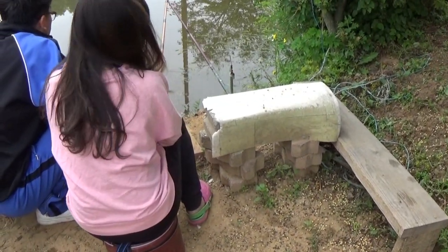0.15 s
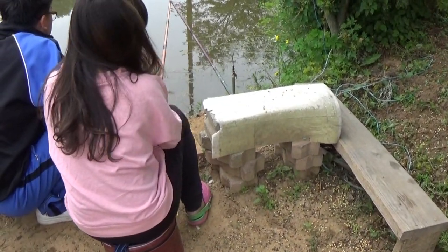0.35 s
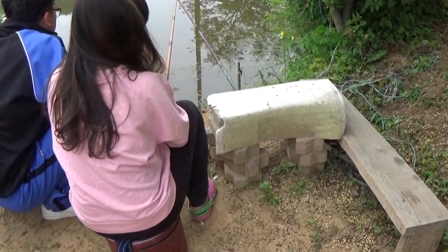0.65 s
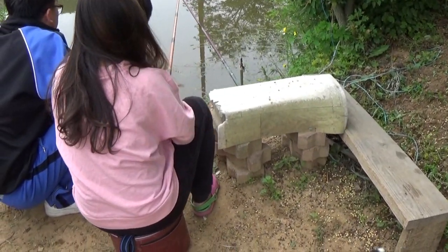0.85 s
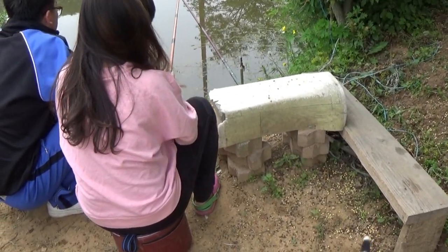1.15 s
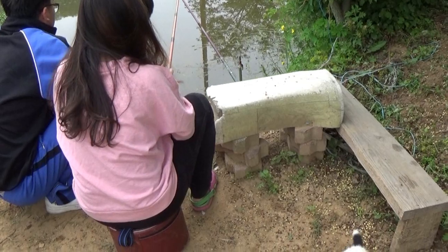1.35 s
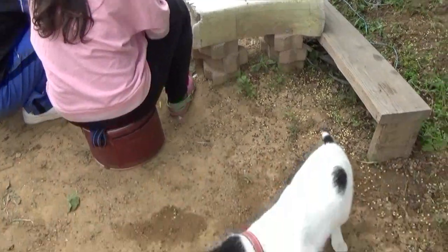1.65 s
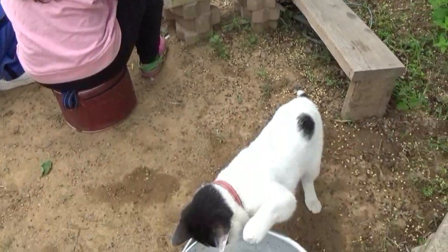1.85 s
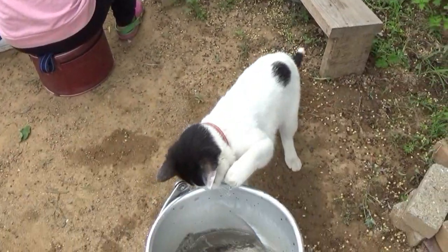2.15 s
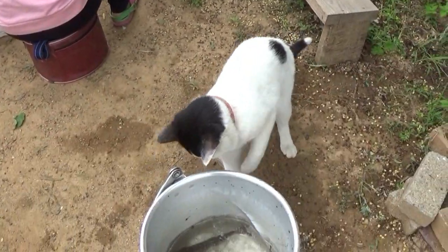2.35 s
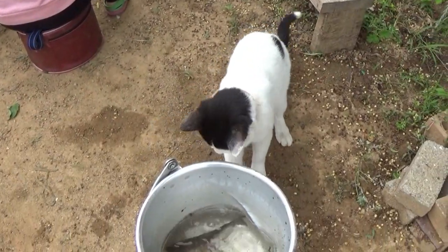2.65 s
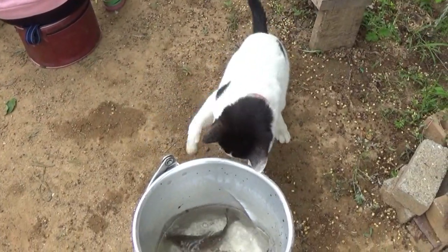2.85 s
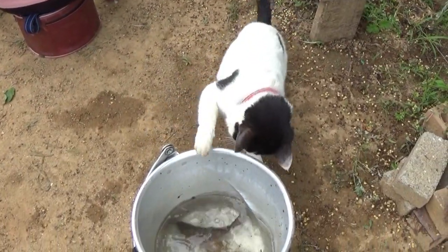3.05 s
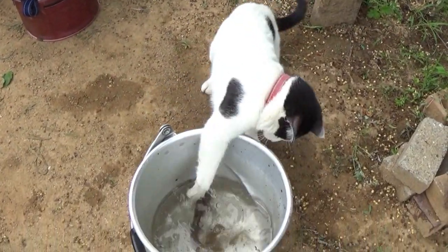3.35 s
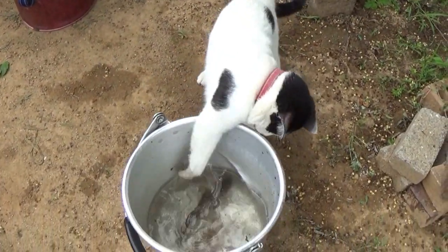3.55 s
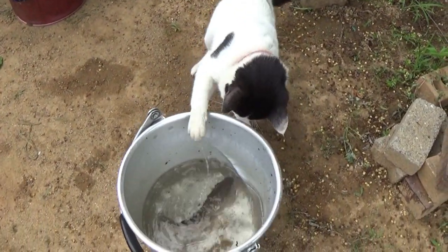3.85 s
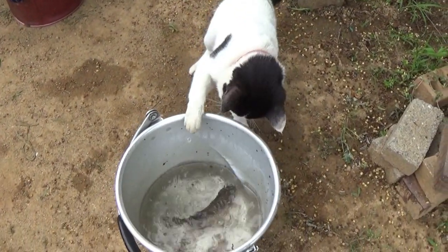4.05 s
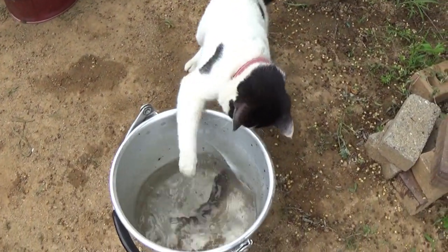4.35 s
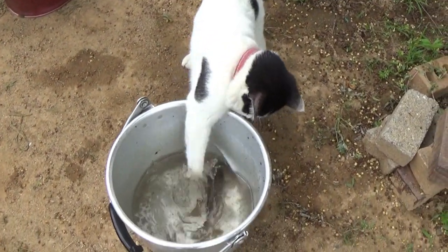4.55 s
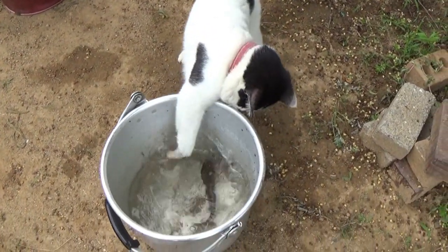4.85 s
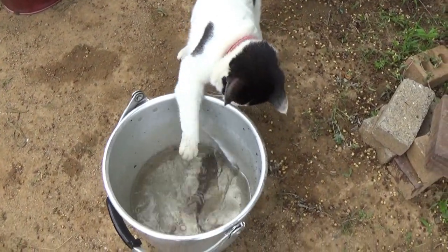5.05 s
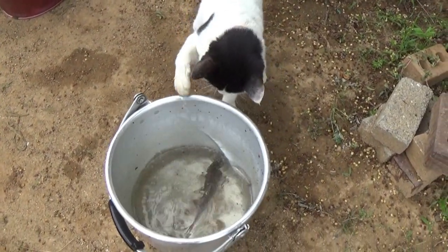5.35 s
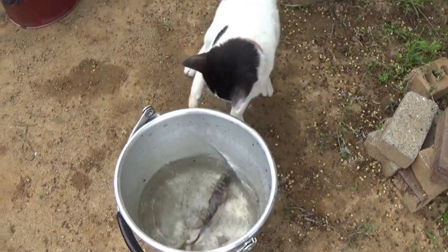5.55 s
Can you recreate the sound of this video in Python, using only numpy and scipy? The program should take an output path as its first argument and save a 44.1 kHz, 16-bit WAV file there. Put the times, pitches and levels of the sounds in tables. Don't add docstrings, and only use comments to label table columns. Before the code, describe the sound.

A quiet outdoor place by a pond: soft airy hush, a faint drone of far machinery, and very soft, rapid, even motor ticks beside the microphone throughout. From the start, isolated crisp wet slaps and drips come from a fish in a metal bucket, with a small cluster at 0.8-0.9 s. Short bird whistles rise and fall in the first second. From 1.2 to 1.9 s the fish thrashes harder: sharp smacks, hissing spray, gurgling bubbles and short metallic reflections, while a small damped collar bell ticks rapidly from about 1.5 to 2 s. Then near calm, with sparse drips and faint bell ticks. Two lower bird calls drop at 3.2 and 3.4 s, just before a dense splash burst from 3.4 to 3.8 s. Another lull holds light drips, with a faint peep at 4.2 s. The last strong thrash, with a hard crack, runs 4.7-5.2 s, thinning to small splats and drips by 5.7 s.

```python
import sys
import numpy as np
from scipy import signal
from scipy.fft import rfft, irfft, next_fast_len
from scipy.io import wavfile

SR = 44100
rng = np.random.default_rng(int(sys.argv[2]) if len(sys.argv) > 2 else 0)


def master_out(mix):
    frames = np.transpose(np.atleast_2d(mix))
    ceiling = np.clip(frames, -1, 1)
    pcm = np.round(ceiling * 32767).astype(np.int16)
    wavfile.write(sys.argv[1], SR, pcm)


def nominal_scale(level):
    x = np.asarray(level, float) / 20
    return 10 ** x


N = 251811
T = np.arange(N) / SR

# frequency in Hz, level in dB per Hz.
AIR_SPECTRUM = [(15, -54), (25, -12), (87, -9), (167, -9.5), (197, -4.5), (349, -7), (470, -2), (651, -2),
                (2270, -12), (2820, -12), (6730, -21), (9330, -16.5), (16500, -22.5)]
# frequency in Hz, likeness from 0 to 1.
AIR_LIKENESS = [(60, 1), (180, 0.97), (550, 0.82), (1650, 0.3), (4970, 0.2), (15000, 1)]
AIR_DB = -61.5
# middle in Hz, width in Hz, level in dB.
DRONE_BANDS = [(465.8, 29.6, -70), (1404, 140, -74.5)]

# time in seconds, level of the spray in dB.
STIR = [(0, -62.5), (.45, -66), (.64, -55), (1.15, -58.5), (1.4, -51), (1.62, -51), (2.0, -63.5),
        (3.17, -68), (3.44, -52.5), (3.53, -48), (3.76, -47), (3.92, -57.5), (4.45, -64), (4.62, -56),
        (4.8, -57), (5.0, -44.5), (5.19, -56), (5.3, -59.5)]
STIR_MID_DB = -55
SLOSH_DB, SLOSH_FOLLOWS, SLOSH_LAG_S = -67.5, 0.75, 0.03
GURGLE_DB, GURGLE_FOLLOWS, GURGLE_LAG_S = -61.5, 1.05, 0.017
# frequency in Hz, level in dB per Hz.
SPRAY_SPECTRUM = [(1180, -12), (2000, -3.5), (4710, 5), (5380, 3.5), (6250, 5.5), (10500, 4), (15000, -1),
                  (16500, -55)]
TOP_CUT_HZ = 15850

# first pitch in Hz, last pitch in Hz, level in dB.
MOTOR_TICKS = [(2954, 2780, 1.5), (3425, 3600, -2.5), (2560, 2980, 1)]
MOTOR_DB, MOTOR_FIRST_S, MOTOR_PERIOD_S = -57, .0198, 1.001 / 30

# start in seconds, length in seconds, first pitch in Hz, last pitch in Hz, level in dB.
WHISTLES = [
    (0.064, 0.06, 1950, 2400, -52.5),
    (0.361, 0.12, 2980, 2100, -49),
    (0.631, 0.042, 1820, 2400, -52),
    (0.952, 0.111, 3030, 2050, -49),
    (4.2, 0.027, 2120, 2110, -56),
]
# start in seconds, length in seconds, first pitch in Hz, held pitch in Hz, level in dB.
DROP_CALLS = [
    (3.211, .13, 1553, 1340, -47),
    (3.392, 0.093, 1815, 1525, -48),
]
WHISTLE_SWELL, CALL_DROP_S, CALL_FADE_DB_PER_S = 0.3, .012, 82

# start in seconds, peak in dB, brightest pitch in Hz,
# time to fade by 60 dB in seconds.
SPLATS = [(.0666, -39.5, 7160, .059), (.1146, -21, 7150, 0.012), (.3023, -32.5, 5500, 0.012),
          (.4249, -32.5, 7850, 0.052), (.5319, -25, 7200, .014), (.5552, -22, 8260, .011),
          (.7674, -21, 8600, 0.015), (.7897, -27, 5000, 0.017), (.8265, -26, 8300, 0.0085),
          (.8525, -33, 6270, .025), (.8815, -34, 7066, 0.075), (.8873, -23, 6850, 0.006),
          (.9035, -25.5, 5360, .006), (1.206, -34, 8040, 0.07), (1.2524, -33, 7500, .012),
          (1.2915, -19, 5230, 0.04), (1.2967, -15, 7100, 0.0092), (1.339, -29, 6700, 0.058),
          (1.4077, -21, 6200, 0.013), (1.4298, -21.5, 6800, 0.022), (1.4335, -17, 6540, .045),
          (1.4568, -38, 5790, 0.014), (1.5231, -18, 5560, 0.01), (1.5601, -22, 5740, 0.024),
          (1.6301, -30.5, 6400, .04), (1.6552, -34, 8150, 0.016), (1.679, -16.5, 8650, 0.019),
          (1.7838, -36, 7800, 0.082), (1.789, -20.5, 7550, 0.011), (1.8637, -30.5, 6950, 0.027),
          (2.4703, -42.5, 8100, 0.024), (3.4321, -33, 6500, 0.11), (3.4645, -23, 5760, 0.05),
                (3.4876, -13, 6370, 0.073), (3.5766, -19, 6270, 0.064), (3.5892, -26, 6400, 0.064),
                (3.6483, -19, 6000, 0.065), (3.679, -25.5, 6060, 0.047), (3.704, -28, 6200, 0.042),
                (3.7422, -20.5, 5500, 0.028), (3.7826, -32, 6450, .025), (3.803, -35, 6350, .025),
                (4.0583, -22.5, 6150, .014), (4.7156, -33, 6200, 0.019), (4.7675, -19, 7830, 0.036),
                (4.7827, -25, 6500, 0.051), (4.8135, -20, 6600, .0098), (4.8219, -24, 11100, .04),
                (4.8593, -20, 6200, 0.054), (4.9205, -23, 9300, 0.03), (4.9373, -17, 7000, 0.049),
                (4.9521, -17.5, 6100, 0.041), (4.959, -21.5, 6630, 0.027), (5.1254, -26, 6150, 0.021),
                (5.133, -24, 6200, 0.04), (5.1486, -18, 5950, 0.0043), (5.3036, -25, 7900, .0091),
                (5.3544, -22.5, 6800, 0.013), (5.395, -38.5, 6060, 0.045), (5.6848, -33.5, 6900, 0.036)]
# start in seconds, peak in dB, pitch in Hz, time to fade by 60 dB in seconds.
PLOPS = [(.1302, -34.5, 2080, 0.034), (.2246, -39, 2970, 0.021), (.5552, -28, 3500, 0.016),
         (.7661, -32, 3120, 0.0087), (.8838, -25, 1080, 0.019), (.8942, -23.5, 1130, 0.049),
         (.9034, -24.5, 1980, 0.016), (1.1348, -27.5, 3150, 0.052), (1.1486, -28.5, 1650, 0.019),
         (1.2951, -34, 4040, 0.076), (1.3459, -29, 2250, 0.022), (1.4178, -32.5, 1440, 0.023),
         (1.4302, -17.5, 3070, 0.015), (1.5233, -24.5, 3600, 0.024), (1.5601, -21, 3930, 0.048),
         (1.6811, -28, 2600, 0.03), (3.5921, -25.5, 3600, 0.03), (3.7115, -26.5, 2900, 0.032),
         (3.7424, -23, 3930, 0.031), (3.796, -31.5, 2400, 0.055), (4.5788, -33, 2600, 0.017),
         (4.8137, -23, 3300, .013), (4.8244, -16.5, 4090, 0.022), (4.9274, -23, 1046, 0.029),
         (4.9387, -22.5, 2770, 0.055), (4.9476, -23, 1630, 0.11), (4.9766, -23.5, 3830, 0.071),
         (5.1167, -26.5, 1780, 0.054), (5.1377, -16.5, 3200, 0.01), (5.2606, -33, 1870, 0.067)]
# start in seconds, peak in dB, brightest pitch in Hz.
DRIPS = [(0.6254, -24, 9000), (0.659, -18, 11600), (0.7835, -26.5, 7260), (0.9426, -32, 12000),
         (.9588, -31, 7660), (1.1352, -14, 11200), (1.2748, -30, 10500), (1.3179, -24.5, 10700),
         (1.3687, -25, 10900), (1.423, -21, 11000), (1.4813, -33, 12500), (1.5878, -28, 11500),
         (1.7945, -16.5, 11370), (2.2049, -38.5, 10700), (2.6337, -42, 9200), (2.6709, -34, 9500),
         (3.085, -28, 9700), (4.33, -31.5, 11700), (4.3757, -26.5, 10400), (4.3894, -35, 10700),
         (4.4595, -37, 10600), (4.579, -29, 10300), (4.6452, -27, 9850), (4.6736, -28.5, 9400),
         (4.6785, -27.5, 9200), (4.829, -20, 7400), (5.0063, -22.5, 11500), (5.0403, -25.5, 10400),
         (5.0845, -21, 10300), (5.3423, -30, 9800)]
DRIP_T60_S = 0.016
# start in seconds, peak in dB, brightest pitch in Hz, time to fade by 60 dB in seconds.
CRACKS = [(.131, -38, 7500, .04), (.2885, -44, 11000, .012), (.4262, -39, 11000, .03),
          (.547, -30, 7600, .008), (.585, -46, 10800, .01), (1.0495, -43, 8310, .01),
          (1.2145, -31, 12000, .01), (1.2518, -33, 11800, .01), (1.339, -31, 10500, .012),
          (1.458, -29, 13000, .01), (1.498, -33, 7900, .012), (1.5145, -37, 9330, .01),
          (1.549, -34, 10500, .01), (1.6305, -35, 10500, .015), (1.654, -31, 13000, .012),
          (1.783, -32, 8200, .01), (1.812, -38, 7500, .02), (1.861, -34, 13000, .02),
          (1.915, -43, 10300, .015), (1.96, -46, 10600, .01), (1.977, -44, 11500, .01),
          (1.988, -43, 10000, .01), (2.009, -43, 9670, .01), (3.331, -41, 10800, .04),
          (3.4875, -19, 9300, .03), (3.5775, -19, 10200, .03), (3.642, -28, 11000, .02),
          (3.6485, -22, 9000, .03), (3.782, -34, 10500, .015), (3.803, -33, 11800, .02),
          (4.057, -28, 11400, .012), (4.606, -41, 10800, .01), (4.634, -40, 11000, .01),
          (4.797, -34, 14000, .008), (4.8275, -7, 8500, .004), (4.83, -19, 10500, .02),
          (4.883, -29, 10500, .02), (4.905, -37, 9600, .012), (4.9375, -19, 10400, .025),
          (5.031, -30, 9500, .01), (5.067, -29, 11800, .015), (5.0845, -23, 11000, .01),
          (5.125, -30, 13500, .025), (5.44, -42, 8940, .015), (5.577, -43, 10500, .015)]
# start in seconds, peak in dB, brightest pitch in Hz, time to fade by 60 dB in seconds.
SNAPS = [(.1138, -15, 10500, .01), (.5305, -21, 9500, .01), (.6265, -13, 8800, .008),
         (.6595, -21, 13500, .008), (.767, -23, 11000, .01), (.9425, -34, 13500, .01),
         (1.135, -24, 13000, .01), (1.4235, -26, 12500, .008), (1.5228, -28, 11000, .01),
         (1.681, -14, 8800, .008), (3.4647, -17, 10800, .025), (3.7422, -24, 9500, .018),
         (4.768, -22, 11500, .02), (4.9265, -32, 13000, .01)]
# middle in seconds, half length in seconds, level in dB, low Hz, high Hz.
SURGES = [(0.709, 0.014, -49, 320, 4500), (.886, 0.026, -44, 170, 500), (1.6, .09, -53, 280, 420),
          (3.51, .04, -50, 300, 520), (3.72, .08, -52, 290, 480), (3.6, .04, -51, 800, 1300),
          (3.72, .06, -51, 850, 1400), (1.4, .08, -52, 650, 1500), (1.7, .035, -46, 1000, 5500),
          (1.34, .04, -48, 2500, 5000), (1.24, .035, -51, 3500, 6000), (4.83, .012, -44, 900, 3000),
          (4.965, .025, -39, 3600, 5200), (3.5, .02, -40, 3400, 5200), (.116, .005, -36, 4000, 8000),
          (.889, .03, -39, 550, 2200), (0.883, 0.043, -46.5, 1700, 7860), (5.424, 0.077, -55, 1260, 5000),
          (3.31, 0.051, -56, 5500, 13500), (3.104, 0.04, -55, 6700, 11300),
          (1.446, 0.014, -35.5, 5200, 6600), (3.366, 0.026, -44, 2400, 15000),
          (3.505, 0.028, -38, 1070, 4000), (3.588, 0.026, -42, 1800, 12600),
          (3.655, 0.015, -34, 2650, 11000), (4.865, 0.037, -38, 1490, 10600),
          (4.937, 0.0091, -38, 390, 1030), (4.96, 0.056, -35.5, 1040, 5100),
          (5.079, 0.013, -39.5, 2500, 12000), (5.147, 0.03, -38.5, 3200, 5700),
          (5.15, 0.05, -40.5, 1360, 3400)]
# start in seconds, peak in dB, first pitch in Hz, last pitch in Hz, length in seconds.
BUBBLES = [(0.608, -34, 2400, 2050, 0.013), (.958, -27.5, 1387, 1780, 0.033),
           (1.443, -36, 2300, 1960, 0.04), (1.458, -42.5, 1035, 1660, 0.04),
           (1.495, -25, 1156, 2070, 0.026), (1.53, -38, 1600, 1730, 0.016), (1.547, -39, 475, 703, 0.039),
           (1.589, -31.5, 1240, 2110, 0.035), (1.593, -41, 936, 1230, 0.054),
           (1.681, -33, 1060, 1250, 0.03), (1.694, -40, 2350, 2500, .012), (3.489, -34, 1300, 1200, .035),
           (3.489, -36, 2150, 2300, .03), (3.487, -30, 7200, 7300, .015), (3.702, -42, 1050, 1170, .025),
           (.208, -56, 6650, 6650, .015), (4.975, -36, 1050, 1250, .035), (5.162, -38, 1500, 2000, .025),
           (5.179, -42, 2300, 2200, .02), (1.33, -46, 4300, 4300, .02), (1.245, -46, 4600, 4800, .012),
           (1.258, -51, 3300, 3150, 0.023), (1.297, -43.5, 1790, 1870, 0.017),
           (3.362, -59, 2800, 2810, 0.019), (3.758, -41, 1170, 1310, 0.026),
           (3.795, -39.5, 1055, 1350, 0.051), (3.796, -48, 2260, 2600, 0.023),
           (4.308, -41, 1580, 1430, 0.014), (4.331, -47.5, 1410, 1840, 0.025),
           (4.795, -49, 643, 1023, 0.068), (4.949, -24, 4310, 4690, 0.026),
           (1.363, -33.5, 1274, 1520, 0.0064), (5.152, -40, 1240, 1860, 0.03),
           (3.488, -23, 4760, 4860, 0.03), (3.486, -25, 6230, 6250, 0.017)]
# start in seconds, peak in dB, pitch in Hz.
BELL_TICKS = [(.4803, -46, 4240), (1.4606, -40, 4180), (1.4815, -29.5, 4190), (1.5429, -32, 4190),
              (1.6187, -21.5, 4210), (1.6484, -41, 4260), (1.6934, -36, 4330), (1.712, -27, 4180),
              (1.729, -29, 4170), (1.7344, -32, 3950), (1.7444, -36, 4050), (1.7739, -33, 4180),
              (1.7868, -35, 3980), (1.8178, -32, 4200), (1.8751, -33, 4230), (1.9001, -37, 4260),
              (1.925, -35, 4260), (1.948, -38, 4310), (1.9679, -40, 4290), (2.1016, -46, 4280),
              (2.2862, -49, 4150), (2.3044, -50, 4160), (2.4894, -48, 4000), (2.8025, -46, 4280),
              (3.475, -31, 4190), (5.3009, -42, 4140), (5.3617, -47, 4160)]
# pitch in Hz, level against the tick in dB.
BELL_OVERTONES = [(9500, -30), (13100, -27)]
BELL_T60_S = .027

# delay in seconds, level in dB.
WALL_ECHOES = [(.0019, -22), (.0032, -24), (.0053, -18), (.0087, -19)]
# time in seconds, left minus right in dB.
BUCKET_PAN = [(0, -0.5), (1.9, -2.5), (2.3, 0.5), (5.71, 1)]


def rms_one(x):
    return x / np.sqrt(np.mean(x ** 2) + 1e-20)


def in_time(rows):
    s, *columns = np.transpose(rows)
    return [np.interp(T, s, column) for column in columns]


def at_hz(points, hz):
    points_hz, points_db = np.transpose(points)
    return np.interp(np.log(np.maximum(hz, 1)), np.log(points_hz), points_db)


def coloured(x, spectrum):
    size = next_fast_len(N)
    hz = np.arange(size // 2 + 1) * SR / size
    gain = nominal_scale(at_hz(spectrum, hz)) * (hz < TOP_CUT_HZ)
    return rms_one(irfft(rfft(x, size) * gain, size)[:N])


def band(x, low_hz, high_hz):
    edges = [low_hz, min(high_hz, SR * .45)]
    return signal.sosfilt(signal.butter(2, edges, "band", fs=SR, output="sos"), x)


def drift(rate):
    knots = np.arange(0, N / SR + 1, .5 / rate)
    return np.interp(T, knots, rng.standard_normal(len(knots)))


def sweep(hz):
    return np.sin(2 * np.pi * np.cumsum(hz) / SR)


def ring(clicks, hz, t60):
    r, w = nominal_scale(-60 / (t60 * SR)), 2 * np.pi * hz / SR
    return signal.lfilter([0, np.sin(w)], [1, -2 * r * np.cos(w), r * r], clicks + 1e-18)


def add(out, s, piece):
    at = round(s * SR)
    out[at:at + len(piece)] += piece[:N - at]


def grains(per_s, spread_db, low_hz, high_hz, cycles):
    sizes = nominal_scale(spread_db * np.minimum(rng.exponential(1, N), 4)) * rng.choice([-1, 1], N)
    clicks = sizes * (rng.random(N) < per_s / SR)
    dealt = rng.integers(0, 16, N)
    pitches = np.geomspace(low_hz, high_hz, num=16)
    rings = sum(ring(clicks * (dealt == k), hz, cycles / hz) for k, hz in enumerate(pitches))
    return rms_one(band(rings, low_hz * 0.88, 17000))


def air():
    hz, likeness = np.transpose(AIR_LIKENESS)
    likeness = np.clip(likeness, 0, .99)
    apart_db = 10 * np.log10((1 - likeness) / (1 + likeness))
    side_spectrum = [(f, db + np.interp(f, hz, apart_db)) for f, db in AIR_SPECTRUM]
    mid = coloured(rng.standard_normal(N), AIR_SPECTRUM)
    side = coloured(rng.standard_normal(N), side_spectrum)
    return nominal_scale(AIR_DB + 0.69 * drift(2.4)) * (mid + nominal_scale(-4.0) * side * [[1], [-1]])


def drone():
    out = np.zeros(N)
    for hz, width, db in DRONE_BANDS:
        out += nominal_scale(db) * rms_one(band(rng.standard_normal(N), hz - width / 2, hz + width / 2))
    return out


def churn():
    spray_db, = in_time(STIR)
    swing = spray_db - STIR_MID_DB
    slosh_db = SLOSH_DB + SLOSH_FOLLOWS * np.interp(T - SLOSH_LAG_S, T, swing)
    gurgle_db = GURGLE_DB + GURGLE_FOLLOWS * np.interp(T - GURGLE_LAG_S, T, swing)
    slosh = rms_one(band(band(rng.standard_normal(N), 280, 560), 280, 560))
    gurgle = band(grains(500, 2.8, 850, 2600, 24.0), 800, 9000)
    mist = grains(5000, 2.4, 2140, 16300, 9.5) + 0.45 * rng.standard_normal(N)
    spray = nominal_scale(3.6 * drift(60) - .6) * coloured(mist, SPRAY_SPECTRUM)
    droplets = nominal_scale(-5) * grains(220, 3.0, 1600, 9000, 30.0)
    specks = nominal_scale(-22) * grains(70, 3.0, 8500, 15000, 9.0)
    fizz = nominal_scale(-77) * grains(36, 2.0, 8000, 12000, 14.0)
    low = nominal_scale(slosh_db + 1.0 * drift(25)) * slosh + nominal_scale(gurgle_db + 2.2 * drift(30)) * gurgle
    return low + nominal_scale(spray_db) * (spray + droplets + specks) + fizz


def motor():
    out, u = np.zeros(N), np.linspace(0, 1, num=360)
    steady, overtone, gliding = [nominal_scale(db) * np.hanning(len(u)) * sweep(first_hz + (last_hz - first_hz) * u)
                                 for first_hz, last_hz, db in MOTOR_TICKS]
    times = np.arange(MOTOR_FIRST_S, N / SR, MOTOR_PERIOD_S)
    chances_db = rng.normal(0, 1.0, (len(times), 2))
    for k, (s, (whole_db, top_db)) in enumerate(zip(times, chances_db)):
        tick = gliding if k % 2 else steady + nominal_scale(top_db) * overtone
        add(out, s, nominal_scale(MOTOR_DB + whole_db) * tick)
    return out


def birds():
    out, flutter = np.zeros(N), nominal_scale(1.7 * drift(60))
    for s, length, first_hz, last_hz, db in WHISTLES:
        u = np.arange(round(length * SR)) / (length * SR)
        hz = first_hz + (last_hz - first_hz) * (u + np.sin(np.pi * u / 2) ** 2) / 2
        add(out, s, nominal_scale(db - 4.5) * np.sin(np.pi * u) ** WHISTLE_SWELL * sweep(hz))
    for s, length, first_hz, held_hz, db in DROP_CALLS:
        t = T[:round(length * SR)]
        hz = held_hz + (first_hz - held_hz) * np.exp(-t / CALL_DROP_S)
        ends = np.clip(np.minimum(t, length - t) / 0.005, 0, 1)
        add(out, s, ends * nominal_scale(db - 3.5 - CALL_FADE_DB_PER_S * t) * sweep(hz))
    return out * flutter


def slaps(table, wide_low_hz, wide_high_hz, narrow, wide_share):
    out, t = np.zeros(N), T[:SR // 10]
    noises = rng.standard_normal((len(table), len(t)))
    for (s, db, hz, t60), noise in zip(table, noises):
        crack = noise * nominal_scale(-60 * t / np.clip(t60, .004, .1))
        crack[0] += 0.098 / t60
        tuned = band(crack, hz / narrow, hz * narrow)
        low_hz = max(wide_low_hz, 0.52 * hz)
        wide = band(band(crack, low_hz, 17300), low_hz, wide_high_hz)
        both = tuned / np.abs(tuned).max() + wide_share * wide / np.abs(wide).max()
        add(out, s, nominal_scale(db - 3.0) * both / np.abs(both).max())
    return out


def surges():
    out = np.zeros(N)
    hiss = .5 * rng.standard_normal(N) * nominal_scale(3.0 * drift(300))
    crowd = grains(3500, 2.5, 280, 13000, 11.0) + hiss
    for s, half, db, low_hz, high_hz in SURGES:
        at, size = round((s - half) * SR), round(2 * half * SR)
        burst = band(band(crowd[at:at + size], low_hz, 19500), low_hz, high_hz)
        add(out, at / SR, nominal_scale(db) * np.hanning(size) * rms_one(burst))
    return out


def bubbles():
    out, wobble_db, waver = np.zeros(N), 3.5 * drift(170), 0.028 * drift(140)
    for s, db, first_hz, last_hz, length in BUBBLES:
        at, u = round(s * SR), np.arange(round(length * SR)) / (length * SR)
        hz = (first_hz + (last_hz - first_hz) * u ** 0.7) * (1 + waver[at:at + len(u)])
        ends = np.minimum(1, 25 * u) * np.minimum(1, 5 * (1 - u))
        add(out, s, nominal_scale(db - 16.7 * u + wobble_db[at:at + len(u)]) * ends * sweep(hz))
    return out


def bell():
    out, t, rattle = np.zeros(N), T[:SR // 20], nominal_scale(2.1 * drift(200))
    for (s, db, tick_hz), top_db in zip(BELL_TICKS, rng.normal(0, 1, len(BELL_TICKS))):
        tone = np.sin(2 * np.pi * tick_hz * t)
        for hz, over_db in BELL_OVERTONES:
            tone = tone + nominal_scale(over_db + 4.4 * top_db) * np.sin(2 * np.pi * hz * t)
        onset = np.minimum(t / 0.00093, 1)
        add(out, s, nominal_scale(db - 60 * t / BELL_T60_S) * onset * tone)
    return out * rattle


def bucket(x):
    out = np.stack([x, x])
    for k, (lag_s, db) in enumerate(WALL_ECHOES):
        for side in (0, 1):
            lag = round(lag_s * SR) + 5 * ((k + side) % 2)
            add(out[side], lag / SR, (-1) ** k * nominal_scale(db) * x)
    return out


def dulled(x):
    return signal.sosfilt(signal.ellip(10, .5, 60, TOP_CUT_HZ, fs=SR, output="sos"), x)


def scene():
    far = air() + drone() + motor() + birds() * nominal_scale([[1.5], [-1.5]])
    drips = [(s, db, hz, DRIP_T60_S) for s, db, hz in DRIPS]
    splats = slaps(SPLATS + drips, 2570, 10600, 1.113, 1.0)
    plops = slaps(PLOPS, 930, 4300, 1.1, 1.0)
    cracks = slaps(CRACKS, 5000, 16500, 1.2, 0.8)
    snaps = slaps(SNAPS, 5000, 18000, 1.3, 1.2)
    water = bucket(churn() + surges() + splats + plops + bell()) + bubbles()
    near = dulled(water + bucket(cracks)) + bucket(snaps)
    pan_db, = in_time(BUCKET_PAN)
    return near * nominal_scale(pan_db / 2 * [[1], [-1]]) + far


def low_pass(x):
    return signal.sosfilt(signal.butter(12, 17000, fs=SR, output="sos"), x)


def record(dry):
    steady = signal.sosfilt(signal.butter(2, 45, "high", fs=SR, output="sos"), dry)
    steady = signal.sosfilt(signal.cheby2(10, 50, 17000, fs=SR, output="sos"), steady)
    return low_pass(steady)


dry = scene()
out = record(dry)
master_out(out)
```